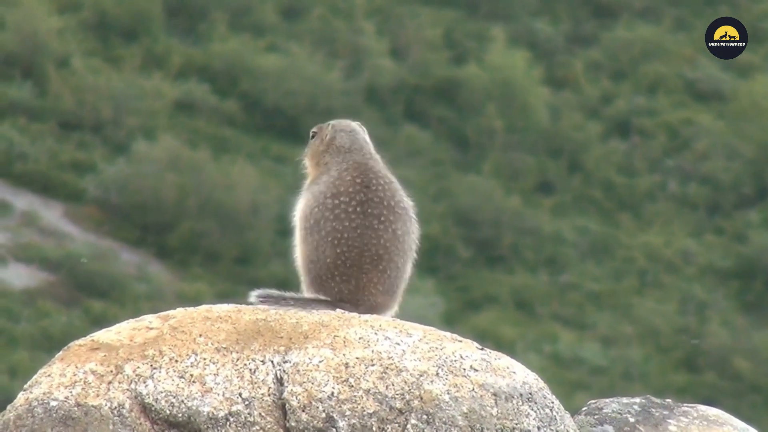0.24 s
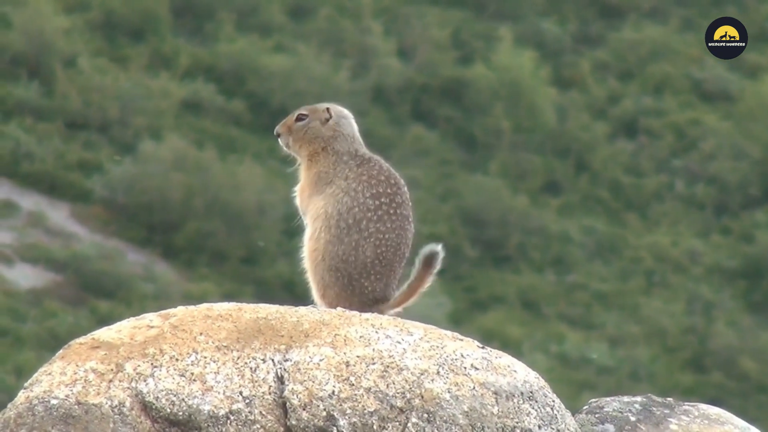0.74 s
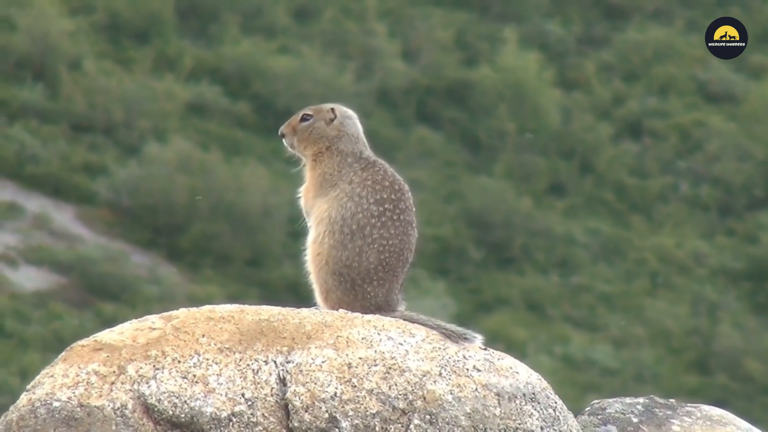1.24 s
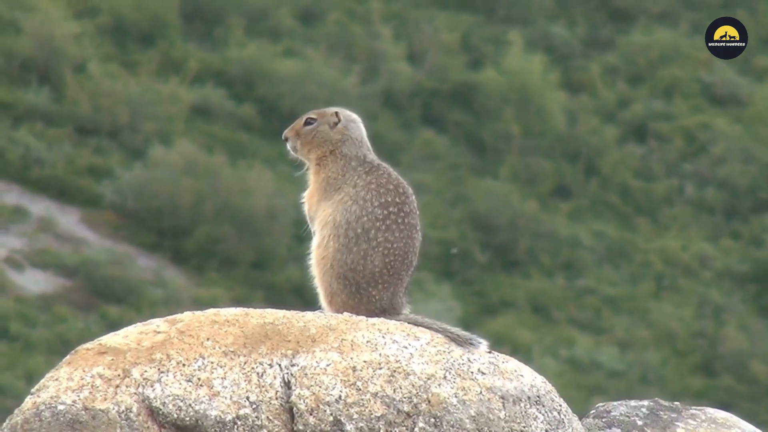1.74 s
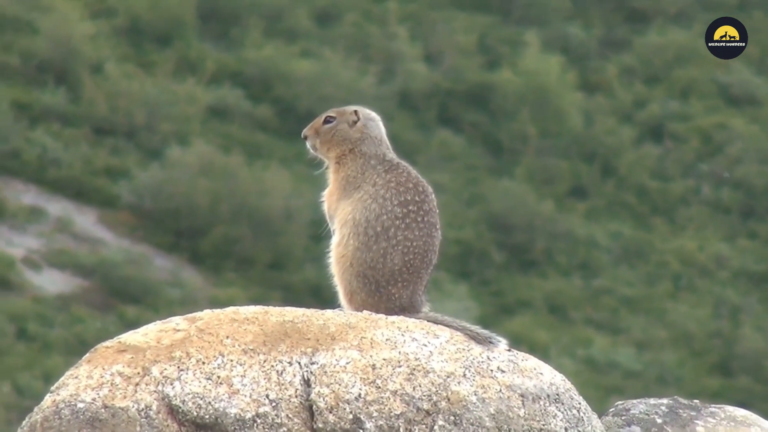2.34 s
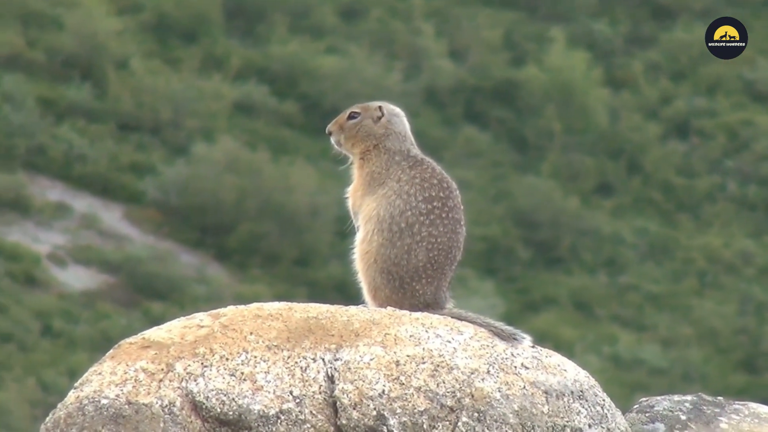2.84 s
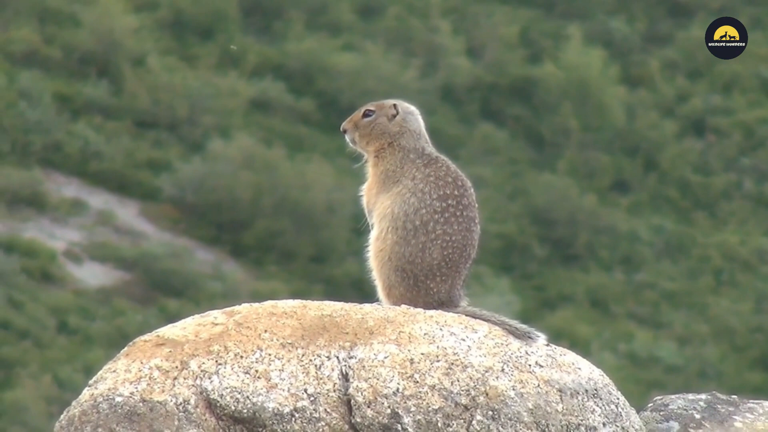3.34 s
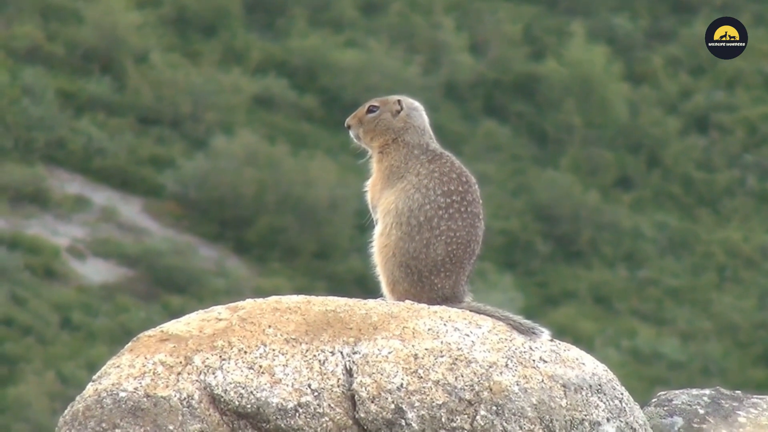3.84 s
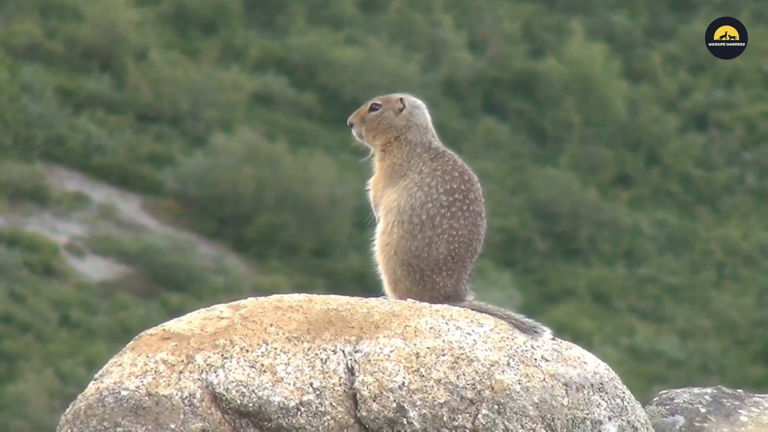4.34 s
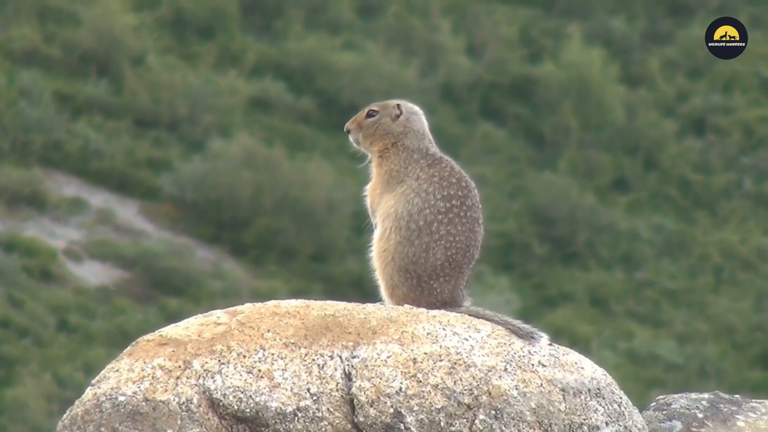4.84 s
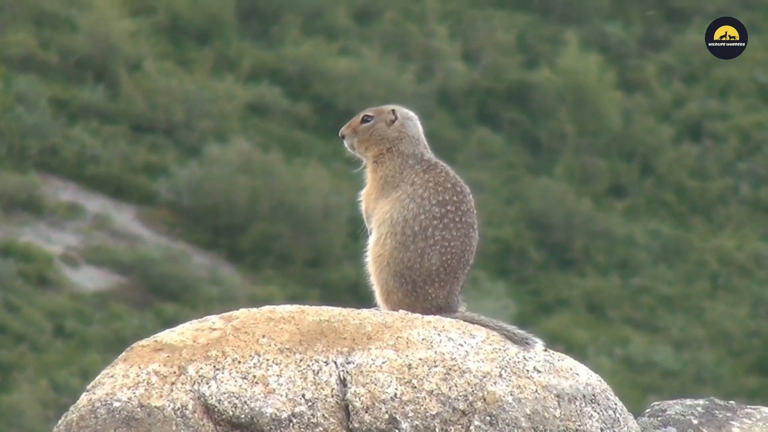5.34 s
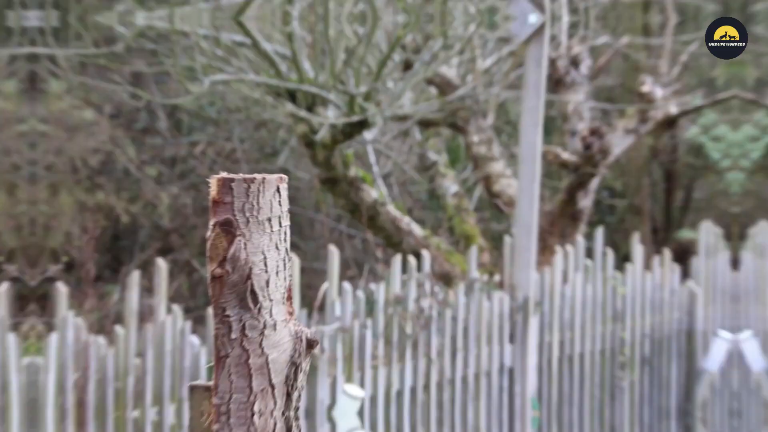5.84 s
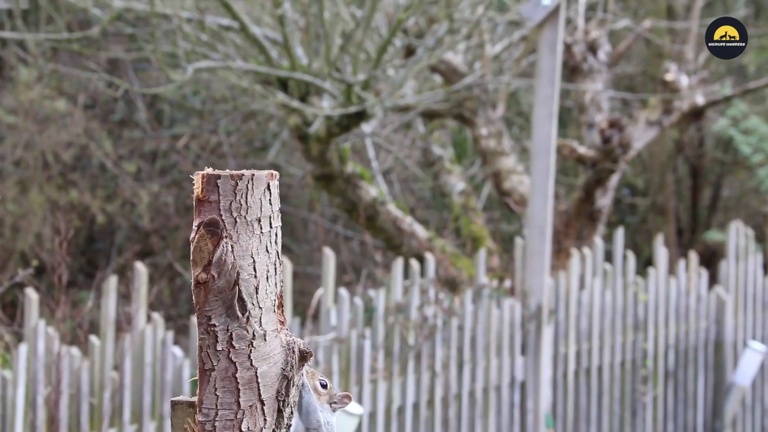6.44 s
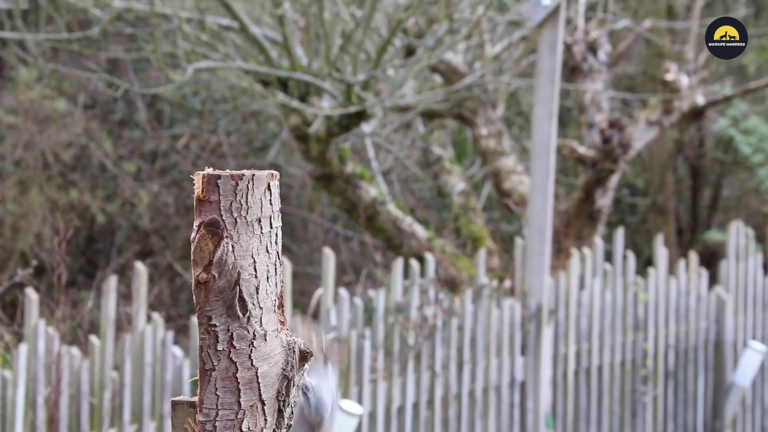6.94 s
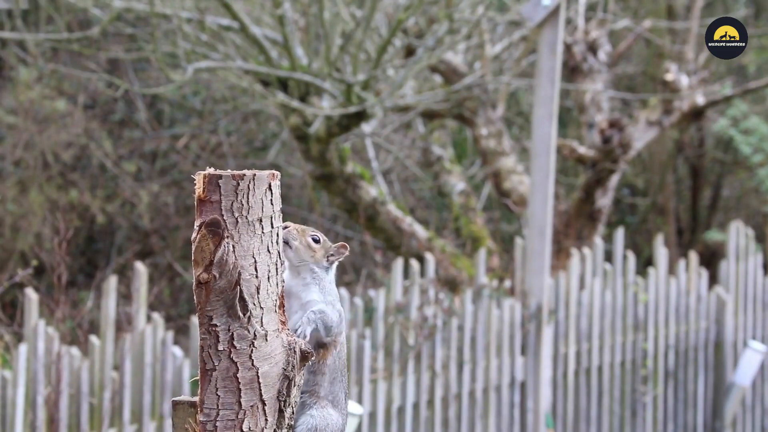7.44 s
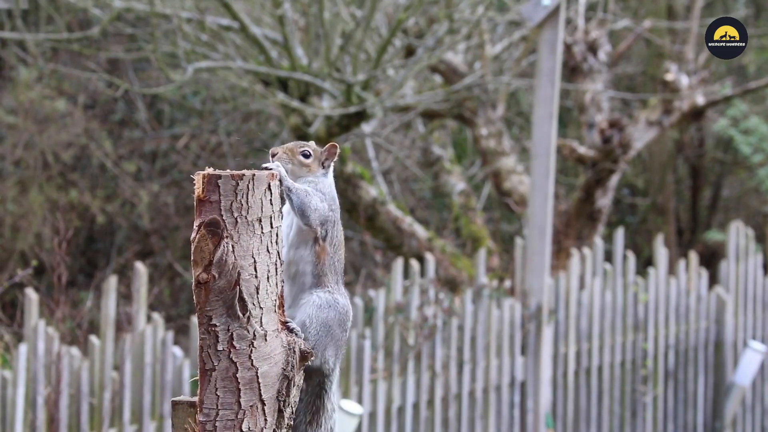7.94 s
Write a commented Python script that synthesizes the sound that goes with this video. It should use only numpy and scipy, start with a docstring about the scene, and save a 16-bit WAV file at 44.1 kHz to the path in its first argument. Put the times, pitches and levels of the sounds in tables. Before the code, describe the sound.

A ground squirrel gives seven piercing, falling whistle-squeals ending in rasp, echoing off an open slope among distant birds, before a louder outdoor rush enters.

```python
"""A ground squirrel squeals seven times on an open hillside; a gruff bark leads into one of the squeals.
Each squeal is a pure whistle from about 7 to 9 kHz that falls and ends in a rasp, made by a sine and shaped noise.
The slope echoes it through a scattered noise tail. Birds, built from gliding sines, whistle and warble further off.
Under it lies faint air made of coloured noise; late on, a louder, wider outdoor rush joins it."""
import sys
import numpy as np
from scipy import signal
from scipy.fft import rfft, irfft, next_fast_len
from scipy.io import wavfile
from scipy.ndimage import uniform_filter1d

SR = 44100
rng = np.random.default_rng(int(sys.argv[2]) if len(sys.argv) > 2 else 0)


def materialize(psi):
    """Save the field psi as 16-bit PCM at rate SR to the path in sys.argv[1].

    A 1-D psi becomes a single channel; in a 2-D psi each row is a channel.
    """
    bounded = np.clip(np.atleast_2d(psi).T, -1, 1)
    quanta = np.round(bounded * 32767).astype(np.int16)
    wavfile.write(sys.argv[1], SR, quanta)


N = 360738
T = np.arange(N) / SR


def undb(db):
    """Turn decibels into gain."""
    return 10 ** (np.asarray(db) / 20)


def unit(x):
    """Scale a sound to rms 1."""
    return x / np.sqrt(np.mean(x ** 2) + 1e-20)


def colour(x, points):
    """Filter a sound so that its spectrum follows (f/Hz, level/dB) points."""
    hz, db = np.transpose(points)
    f = np.maximum(np.fft.rfftfreq(len(x), 1 / SR), 1)
    gain = undb(np.interp(np.log(f), np.log(hz), db))
    return irfft(rfft(x) * gain, len(x))


def noise(points):
    """Coloured noise of rms 1."""
    white = rng.standard_normal(next_fast_len(N))
    return unit(colour(white, points)[:N])


def walk(rate, size=N):
    """Smooth random wandering, spread about 1, that changes about rate times a second."""
    k = max(int(SR / rate), 1)
    steps = np.repeat(rng.standard_normal(size // k + 2), k)
    return 1.3 * uniform_filter1d(uniform_filter1d(steps, k), k)[:size]


def curve(rows):
    """Join (t/s, value) rows by straight lines."""
    return np.interp(T, *np.transpose(rows))


def fade(sound):
    """Open and close a sound within a millisecond or two."""
    return sound * signal.windows.tukey(len(sound), min(1, 128 / len(sound)))


def add(track, start_s, sound):
    """Mix a sound into a track."""
    i = max(int(start_s * SR), 0)
    track[i:i + len(sound)] += fade(sound)[:max(N - i, 0)]


def slope(x, t60_s, build_s, early_db):
    """Echo scattered by rocks and brush: a quick near part and a long tail that builds up."""
    # tint of the echo: f/Hz, level/dB
    slope_tint = [(1000, -0.5), (2200, -2), (3100, -3.5), (4100, -4.5), (4700, 0), (6000, 9), (7300, 0.5),
                  (8900, -2.5), (9500, -43)]
    t = np.arange(int(1.3 * SR)) / SR
    tail = undb(-60 * t / t60_s)
    near = undb(early_db) * np.exp(-t / 0.013)
    shape = (1 - np.exp(-t / build_s)) * (tail + near)
    response = rng.standard_normal(len(t)) * shape / np.sqrt(np.sum(shape ** 2))
    return signal.fftconvolve(x, colour(response, slope_tint))[:N]


def restless(points, flicker_db):
    """Coloured noise whose lows and mids flicker on their own while the treble stays smooth."""
    x = noise(points)
    low, low_mid = (signal.sosfiltfilt(signal.butter(2, hz, fs=SR, output="sos"), x) for hz in (180, 900))
    low_part = low * undb(flicker_db * walk(12))
    mid_part = (low_mid - low) * undb(flicker_db / 2 * walk(12))
    return low_part + mid_part + x - low_mid


def hum(lines):
    """Faint tones that waver in level and phase."""
    tones = []
    for hz, db in lines:
        gain = np.sqrt(2) * undb(db + 2 * walk(2.4))
        tones.append(gain * np.sin(2 * np.pi * hz * T + 0.3 * walk(7.7)))
    return sum(tones)


def outdoors():
    """Quiet centred air, then a louder noise rush that starts with a low drone and is wide in the treble."""
    # spectra of the quiet air, the rush and its drone: f/Hz, relative level/dB
    air_tint = [(15, -61.5), (25, -17.5), (102, -7.5), (195, -18), (237, -10.5), (282, -18), (361, -15),
                (419, -16), (592, -18.5), (670, -20.5), (758, -20.5), (1070, -23.5), (2420, -28.5),
                (9210, -44.5), (12000, -79), (20300, -120)]
    rush_tint = [(25, 1), (50, 2), (120, -2.5), (220, -2), (380, -3.5), (560, -4), (750, -7.5), (1600, -17),
                 (2400, -16.5), (4000, -19.5), (6000, -23), (9000, -25.5), (14500, -30.5), (16000, -52.5)]
    drone_tint = [(230, -23), (310, 2.5), (360, 3.5), (430, -6.5), (520, 7), (600, -2.5), (760, -41)]
    # faint hums in the air and in the rush: f/Hz, level/dB (the rush hum also follows the rush level)
    air_hum = [(102.3, -83.5), (242.2, -76.5)]
    rush_hum = [(118.4, -60.5), (349.9, -59.5)]
    # how the rush comes in: t/s, rush level change/dB, drone level within the rush/dB
    rush_course = [(5.81, -45, -12), (5.845, -0.5, 3), (6.1, -1, 1), (6.5, 0.5, -8.5), (6.9, -1.5, -5),
                   (7.4, 0, -10.5), (7.8, -0.5, -15), (8.18, -1, -10)]
    air_db, rush_db = -65, -48.5
    s, level_db, drone_db = np.transpose(rush_course)
    air = restless(air_tint, flicker_db=4.0) * undb(air_db) + hum(air_hum)
    drone = noise(drone_tint) * undb(np.interp(T, s, drone_db))
    mid = (restless(rush_tint, flicker_db=0.8) + drone) * undb(rush_db) + hum(rush_hum)
    # added left and subtracted right, mostly in the treble: this makes the width
    side_tint = [(40, -14.5), (200, -10.5), (500, -7.5), (1000, -3), (4000, -1.5), (12000, -13)]
    side = colour(noise(rush_tint), side_tint) * undb(rush_db)
    rush = mid + side * np.array([[1], [-1]])
    return air + rush * undb(np.interp(T, s, level_db))


def rumble(voice):
    """Low noise that swells and fades with the loudness of each squeal."""
    # spectrum of the rumble: f/Hz, relative level/dB
    rumble_tint = [(20, -3.5), (50, -1), (110, -7.5), (250, -20), (700, -21), (2000, -36.5), (4000, -63.5)]
    below_voice_db = -33
    loudness = np.sqrt(np.abs(uniform_filter1d(voice ** 2, size=2048)))
    return undb(below_voice_db) * loudness * noise(rumble_tint)


def bumps():
    """Low bumps on the microphone: soft knocks made of quickly dying low sines."""
    # the bumps: t/s, f/Hz, level before the decay/dB, decay/s
    knocks = [(1.71, 91, -37.5, 0.0086), (2.214, 66, -36.5, 0.0073), (4.379, 35.2, -51.5, 0.053),
              (4.534, 74, -27, 0.0071), (4.594, 26.6, -30.5, 0.055), (5.479, 59.6, -37.5, 0.017),
              (5.79, 39.2, -44.5, 0.084), (6.491, 111, -36, 0.021)]
    out, t = np.zeros(N), np.arange(SR // 2) / SR
    for s, hz, db, decay in knocks:
        envelope = np.exp(-t / decay) * (1 - np.exp(-t / 0.00138))
        add(out, s, undb(db) * np.sin(2 * np.pi * hz * t) * envelope)
    return out


def noise_bursts():
    """Short grainy noise bursts, mostly around the squeals, some where the voice jumps register."""
    # the bursts: t/s, half length/s, level/dB
    burst_rows = [(3.707, 0.011, -75), (4.599, 0.03, -28), (5.421, 0.059, -54), (6.034, 0.035, -44.5),
                  (6.647, 0.02, -41), (6.742, 0.033, -37), (6.81, 0.01, -35)]
    # their spectrum: f/Hz, relative level/dB
    burst_tint = [(100, -2.5), (1000, -4), (3000, -5), (6000, 3), (8500, 6), (9300, -35), (15000, -43.5)]
    swells = sum(undb(db) * np.exp(-((T - s) / half) ** 2) for s, half, db in burst_rows)
    grain = undb(2 * walk(500))
    return swells * noise(burst_tint) * grain


def whistle(hz, db, rough, overtone_db, scatter_hz, edge):
    """One bird note: a sine and its octave along a pitch curve; roughness makes pitch and level waver."""
    u = np.linspace(0, 1, len(hz))
    phase = 2 * np.pi * np.cumsum(hz + rough * scatter_hz * walk(700, len(u))) / SR
    swell = np.abs(np.sin(np.pi * u)) ** edge
    gain = undb(db + 4.6 * rough * walk(140, len(u))) * swell
    return np.sqrt(2) * gain * (np.sin(phase) + undb(overtone_db) * np.sin(2 * phase))


def notes(table, overtone_db, scatter_hz, edge):
    """Whistled notes whose pitch bends smoothly through three points."""
    out = np.zeros(N)
    for start, length, first, middle, last, db, rough in table:
        bend = np.polyfit([0, .5, 1], [first, middle, last], 2)
        hz = np.polyval(bend, np.linspace(0, 1, int(length * SR)))
        add(out, start, whistle(hz, db, rough, overtone_db, scatter_hz, edge))
    return out


def level_notes(table):
    """Turn rows with one pitch into note rows that stay on it."""
    return [(start, length, hz, hz, hz, db, rough) for start, length, hz, db, rough in table]


def chatter(count=1100, blur_db=-1.5, chirps_db=-4):
    """Many far birds: short gliding chirps, partly blurred by distance into a band of noise."""
    # loudness of the chatter: t/s, level/dB
    chatter_course = [(0, -59.5), (.8, -59), (1.35, -60), (1.75, -59.5), (2.2, -61.5), (2.5, -67),
                      (2.9, -76.5), (3.8, -73), (4.4, -65.5), (5.2, -64), (5.7, -65.5), (6.2, -86)]
    # spectrum of the blur: f/Hz, relative level/dB
    blur_tint = [(1500, -38.5), (1900, -8.5), (2100, 3.5), (2800, 3), (3300, -4.5), (4500, -2.5),
                 (7000, -29.5)]
    when, length, pitch, glide, size = rng.random((count, 5)).T
    hz = 2100 + 950 * pitch ** 2
    half_glide = 130 * (glide - .5)
    rows = np.column_stack([6.2 * when, .02 + 0.044 * length,
                            hz - half_glide, hz, hz + half_glide, -12 * size, .3 * length])
    chirps = unit(notes(rows, overtone_db=-42.5, scatter_hz=201.8, edge=0.87))
    blur = noise(blur_tint)
    return (undb(blur_db) * blur + undb(chirps_db) * chirps) * undb(curve(chatter_course))


def arches():
    """A far bird's whistles, which climb from the foot, round off at the crest and drop back."""
    # start/s, rise/s, fall/s, foot f/Hz, crest f/Hz, level at the foot before mixing/dB, roughness/0-1
    arch_rows = [(.11, 0.084, 0.036, 3840, 5560, -69.5, 0.38), (.51, 0.12, 0.042, 3140, 5030, -50, 0.22),
                 (.635, 0.063, 0.028, 4280, 5380, -64, 0.24), (0.857, .108, .135, 3020, 6230, -55, .12),
                 (1.269, 0.093, 0.063, 2800, 4710, -47.5, .3), (1.548, 0.092, 0.066, 2770, 6510, -53, 0.21),
                 (1.995, .13, 0.045, 2860, 6100, -56.5, 0.07), (3.36, 0.073, 0.068, 3065, 3600, -61.5, 0.1),
                 (3.855, .115, .11, 3397, 4220, -62, .06), (4.09, .035, 0.07, 3050, 3580, -62.5, .08),
                 (4.75, 0.18, 0.079, 3550, 4140, -58, 0.1)]
    # every arch is rounder going up than coming down, and thinner as it climbs
    rise_bend, fall_bend, db_per_khz = 2.1, 1.1, -2.5
    out = np.zeros(N)
    for start, rise, fall, foot_hz, crest_hz, db, rough in arch_rows:
        t = np.arange(-rise, fall, 1 / SR)
        below = np.where(t < 0, np.abs(t / rise) ** rise_bend, np.abs(t / fall) ** fall_bend)
        hz = crest_hz - (crest_hz - foot_hz) * below
        climb_khz = (hz - foot_hz) / 1000
        note = whistle(hz, db + db_per_khz * climb_khz, rough, overtone_db=-29.5, scatter_hz=300, edge=0.35)
        add(out, start, note)
    return out


def far_birds(tick_s=0.0073, direct_db=-1, scattered_db=-5):
    """Arched and level whistles that flutter as they arrive by several paths, and a short run of dry ticks."""
    # level whistles: start/s, length/s, f/Hz, level before mixing/dB, roughness/0-1
    piping_rows = [(.13, 0.14, 3580, -59.5, 0.42), (.85, 0.15, 2950, -61.5, 0.1),
                   (1.25, .15, 2095, -60, 0.27), (1.6, 0.26, 2897, -55, 0.3), (2.1, .19, 2174, -58.5, 0.53),
                   (2.92, 0.091, 2740, -72, 0.6), (3.09, 0.072, 2465, -71, 0.7)]
    # dry ticks: t/s, level/dB
    tick_rows = [(.002, -56), (0.042, -54.5), (.07, -62), (0.114, -56.5), (.143, -59), (.197, -57.5),
                 (.228, -68)]
    # spectrum of the ticks: f/Hz, relative level/dB
    tick_tint = [(2500, -13), (3600, 6.5), (5000, -19), (6400, 0), (7500, -16), (9000, -43)]
    ticks = sum(undb(db) * np.exp(-((T - s) / tick_s) ** 2) for s, db in tick_rows)
    song = arches() + notes(level_notes(piping_rows), overtone_db=-34.5, scatter_hz=300, edge=.3)
    scattered = slope(song, t60_s=.12, build_s=.002, early_db=0)
    return undb(direct_db) * song + undb(scattered_db) * scattered + ticks * noise(tick_tint)


def tree_birds(direct_db=-3, echo_db=-1):
    """Birds in the trees all around: thin whistles whose echoes reach each ear by different paths."""
    # steady whistles: start/s, length/s, f/Hz, level before mixing/dB, roughness/0-1
    tree_rows = [(6.06, 0.22, 7070, -46, 0.12), (6.35, 0.24, 6870, -45, 0.24),
                 (6.6, 0.33, 2395, -61.5, 0.55), (7.15, 0.088, 3995, -49, 0.03),
                 (7.16, 0.19, 2410, -57.5, 0.24), (7.46, .12, 3230, -54.5, .6),
                 (7.58, 0.2, 2395, -59.5, 0.24), (7.71, 0.15, 3980, -50.5, 0.2),
                 (8.03, .18, 3310, -56.5, .55)]
    # quick falling chips: t/s, level before mixing/dB
    chip_rows = [(7.5, -58), (7.789, -55.5), (8.136, -58)]
    # pitch of every chip: first f/Hz, middle f/Hz, last f/Hz
    chip_pitch = (6240, 5200, 4240)
    chip_s = 0.021
    chips = [(s, chip_s, *chip_pitch, db, .12) for s, db in chip_rows]
    song = notes(level_notes(tree_rows) + chips, overtone_db=-48, scatter_hz=248, edge=0.11)
    around = np.array([slope(song, t60_s=0.84, build_s=0.0071, early_db=-5) for _ in range(2)])
    return undb(direct_db) * song + undb(echo_db) * around


def warble(count=5, rough=0.29):
    """A nearer bird's phrases: a swoop that rebounds, a trill of upsweeps that sink and fade, a level note."""
    # start/s, swoop/s, trill starts after/s, beat/s, first trill top f/Hz, closing note/s, swoop level/dB
    phrases = [(3.819, .076, .078, .0205, 2835, 0.056, -40.5), (4.158, .094, .094, .0195, 2550, 0.014, -40)]
    # tint given by the beak: f/Hz, level/dB
    beak_tint = [(1700, -5.5), (2000, -5.5), (2250, 2), (2500, -2.5), (2900, -7), (5000, -1.5)]
    # the swoop swings about the resting pitch and settles
    rest_hz, swoop_hz, swoop_turns, swoop_damping = 2165, 646, 1.05, 2.25
    # trill_duty is the share of a beat that sounds; the dB here are against the swoop
    trill_foot_hz, trill_duty, hz_per_beat = 1920, .88, -57.5
    trill_db, db_per_beat, closing_db = 3.5, -1.3, 2.1
    out, rows = np.zeros(N), []
    for start, swoop, trill_after, beat, top_hz, closing, db in phrases:
        u = np.linspace(0, 1, int(swoop * SR))
        hz = rest_hz + swoop_hz * np.exp(-swoop_damping * u) * np.cos(2 * np.pi * swoop_turns * u)
        add(out, start, whistle(hz, db, rough, overtone_db=-30.5, scatter_hz=140, edge=.35))
        trill_start = start + trill_after
        for k in range(count):
            top = top_hz + k * hz_per_beat
            beat_db = db + trill_db + k * db_per_beat
            middle = (trill_foot_hz + top) / 2
            rows.append((trill_start + k * beat, trill_duty * beat, trill_foot_hz, middle, top, beat_db, rough))
        rows += level_notes([(trill_start + count * beat, closing, rest_hz, db + closing_db, rough)])
    return colour(out + notes(rows, overtone_db=-44, scatter_hz=300, edge=0.6), beak_tint)


def buzz(flutter_hz=194, swing_hz=170, throb=0.37):
    """The nearer bird's falling whistle, whose pitch and level flutter so fast that it sounds husky."""
    # t/s, f/Hz, level before the flutter/dB
    buzz_course = [(4.899, 3230, -53), (4.921, 3020, -40), (4.964, 2620, -39.5), (5.018, 2256, -41.5),
                   (5.081, 2070, -47), (5.15, 2010, -49.5), (5.19, 1950, -67)]
    s, pitch, db = np.transpose(buzz_course)
    t = np.arange(s[0], s[-1], 1 / SR)
    flutter_rate = flutter_hz * (1 + 0.022 * walk(103, len(t)))
    flutter = np.sin(2 * np.pi * np.cumsum(flutter_rate) / SR)
    hz = np.interp(t, s, pitch) + swing_hz * flutter + 40 * walk(600, len(t))
    gain = np.sqrt(2) * undb(np.interp(t, s, db)) * (1 + throb * flutter)
    out = np.zeros(N)
    add(out, s[0], gain * np.sin(2 * np.pi * np.cumsum(hz) / SR))
    return out


def near_peeps():
    """Thin peeps near by: short whistles with a very weak octave."""
    # start/s, length/s, first f/Hz, middle f/Hz, last f/Hz, level/dB, roughness/0-1
    peep_rows = [(4.507, 0.12, 2940, 2880, 2930, -41, 0.17), (4.512, 0.067, 3280, 3240, 3200, -38.5, 0),
                 (4.602, .042, 2684, 2620, 2670, -36.5, 0.11), (5.367, 0.008, 8800, 8930, 8750, -35.5, 0),
                 (5.375, 0.095, 8900, 8730, 9250, -45.5, .25), (6.572, 0.012, 8900, 8800, 9050, -43, 0.06),
                 (2.213, .03, 8890, 8920, 8800, -43, .15), (4.541, .018, 9000, 9020, 8900, -43, 0),
                 (6.708, 0.017, 8830, 9050, 9200, -44, .2)]
    return notes(peep_rows, overtone_db=-44, scatter_hz=247, edge=0.49)


def held_down(echo, voice, threshold_db, release_s):
    """Fast gain control lowers the echo while the voice is loud and lets it swell back after."""
    power = np.abs(uniform_filter1d(voice ** 2, size=128))
    keep = np.exp(-1 / (release_s * SR))
    slow_power = signal.lfilter([1 - keep], [1, -keep], power)
    power = np.maximum(power, slow_power)
    return echo / np.sqrt(1 + power / undb(threshold_db) ** 2)


def bark(jitter=0.032, gruff=0.96):
    """A gruff bark: uneven voice pulses and noise that throbs with them, sent through the throat."""
    # t/s, pulse rate f/Hz, level/dB
    bark_course = [(4.49, 484, -39), (4.493, 512.4, -34.5), (4.513, 575, -29), (4.53, 642, -29),
                   (4.538, 572, -36), (4.546, 516, -40.5)]
    # resonance of the throat: f/Hz, relative level/dB
    throat_tint = [(300, -8.5), (560, -2), (1200, -3), (2500, -2), (4500, -3), (6000, 6), (8000, -12),
                   (9000, -40.5)]
    s, pitch, db = np.transpose(bark_course)
    t = np.arange(s[0], s[-1], 1 / SR)
    hz = np.interp(t, s, pitch) * (1 + jitter * walk(1200, len(t)))
    phase = 2 * np.pi * np.cumsum(hz) / SR
    pulses = unit(sum(np.cos(k * phase) / k ** 0.52 for k in range(1, 16)))
    gated = rng.standard_normal(len(t)) * (1 + .5 * np.cos(phase))
    air = unit(colour(gated, [(800, -8.5), (4000, -4.5), (9000, 1), (12000, -30.5)]))
    # the mouth smears each pulse: only the phases of a short noisy ring are used
    ring = rng.standard_normal(64) * np.exp(-np.arange(64) / SR / 0.00061)
    smear = np.exp(1j * np.angle(rfft(ring, len(t))))
    smeared = irfft(rfft(pulses + gruff * air) * smear, len(t))
    out = np.zeros(N)
    add(out, s[0], unit(colour(smeared, throat_tint)) * undb(np.interp(t, s, db)))
    return out


def squeal_pitch(t, start, top_hz, scoop_hz, hold, fall, bend):
    """Scoop to the top, perhaps slip to another register, fall to the break, then sink ever more slowly."""
    # register slips of the voice: t/s, step f/Hz, glide/s
    slip_rows = [(1.7206, -1367, 0.019), (5.461, -2150, 0.024), (5.986, -380, 0.0044), (5.999, 800, .004),
                 (7.1457, -510, .0017)]
    scoop_s, break_hz, lowest_hz = 0.011, 4587, 2200
    slips = [row for row in slip_rows if start < row[0] < start + hold + fall]
    held = top_hz - scoop_hz * np.exp(-(t - start) / scoop_s)
    held = held + sum(step * (1 + np.tanh((t - s) / glide)) / 2 for s, step, glide in slips)
    drop = top_hz + sum(step for _, step, _ in slips) - break_hz
    hz = held - drop * (np.maximum(t - start - hold, 0) / fall) ** bend
    # below the break the pitch only creeps towards its lowest value
    span = break_hz - lowest_hz
    sinking = lowest_hz + span * np.exp(np.minimum(hz - break_hz, 0) / span)
    return np.where(hz > break_hz, hz, sinking)


def squeal_level(t, start, attack, length, release):
    """Level in dB: a quick attack, full effort apart from brief level changes, and a release after the fall."""
    # moments when the squeal's level briefly changes, mostly dips: t/s, half length/s, level change/dB
    dip_rows = [(2.263, 0.0078, -7.5), (5.444, .002, 0.5), (6.019, 0.0019, -15), (6.751, 0.0042, -16)]
    attack_bend, release_db = 1.1, 32  # curve of the attack (1 = even); drop over one release time
    rise = attack_bend * 20 * np.log10(np.clip((t - start) / attack, 1 / SR, 1))
    decay = release_db * np.maximum(t - start - length, 0) / release
    dips = sum(db * np.exp(-((t - s) / half) ** 2) for s, half, db in dip_rows)
    return rise - decay + dips


def squirrel(jitter=0.0035, shimmer=.05, break_up=0.028, rasp_hz=4200, husk_db=-30):
    """Falling whistles that turn to rasp as the pitch nears rasp_hz; gives the voice and its echo share."""
    # start/s, attack/s, top f/Hz, scoop from below f/Hz, hold/s, fall/s, bend of the fall (1 = straight),
    # release/s, pitch waver/share, level/dB, echo send against voice/dB, rasp against tone before slack/dB
    squeal_rows = [(1.664, 0.056, 9005, 1798, 0.1, 0.077, 1.43, 0.016, 0.0031, -23, -18, -16),
                   (2.234, 0.013, 8800, 98, 0.0069, .136, 1.82, 0.017, .004, -23.5, -19, -19),
                   (4.558, .005, 8870, 0, 0.0043, .025, .92, 0.032, 0.0065, -20.5, -2.5, -8),
                   (5.426, 0.0096, 9030, 54, .062, 0.05, 1.52, 0.071, 0.0035, -20, -13.5, -11.5),
                   (5.931, 0.022, 7975, 1900, 0.11, 0.091, .76, 0.016, 0.012, -20, -17, -20.5),
                   (6.725, 0.0091, 8790, -0.5, 0.0096, .0615, 0.72, 0.055, 0.0056, -20.5, -13, -17.5),
                   (7.098, 0.0062, 6986, 652, 0.067, 0.089, 2.92, 0.046, 0.0043, -20, -19.5, -19)]
    # spectrum of the rasp: f/Hz, relative level/dB
    rasp_tint = [(60, -0.5), (300, -7.5), (1200, -12.5), (2500, -4), (4500, -4), (8500, -12.5), (9400, -27),
                 (15000, -39)]
    longest_release_s = 0.027  # the voice stops this long after the fall at the latest
    voice, sent, hiss = np.zeros(N), np.zeros(N), noise(rasp_tint)
    for start, attack, top_hz, scoop_hz, hold, fall, bend, release, waver, db, echo_db, rasp_db in squeal_rows:
        t = np.arange(start, start + hold + fall + min(release, longest_release_s), 1 / SR)
        hz = squeal_pitch(t, start, top_hz, scoop_hz, hold, fall, bend)
        hz = hz * (1 + waver * walk(120, len(t)))
        # the folds lose their grip at low pitch, most of all around rasp_hz
        slack = .05 + .95 / (1 + (np.log(hz / rasp_hz) / .2) ** 2) ** 1.5
        hz = hz * (1 + (jitter + break_up * slack) * walk(1400, len(t)))
        level_db = db + squeal_level(t, start, attack, hold + fall, release)
        gain = undb(level_db) * (1 + shimmer * walk(250, len(t)))
        husk = undb(husk_db) * walk(2500, len(t))  # turbulence spreads a skirt around the tone
        tone = np.sqrt(2) * gain * (1 + husk) * np.sin(2 * np.pi * np.cumsum(hz) / SR)
        rasp = gain * undb(rasp_db) * slack * hiss[int(start * SR):][:len(t)]
        add(voice, start, tone + rasp)
        add(sent, start, undb(echo_db) * (tone + rasp))
    return voice, sent


def scene():
    """The squirrel in front, its echo behind, birds and air around."""
    voice, sent = squirrel()
    gruff = bark()
    raw_echo = slope(sent + undb(-16.0) * gruff, t60_s=0.76, build_s=0.013, early_db=9.0)
    echo = held_down(raw_echo, voice, threshold_db=-28.0, release_s=0.0013)
    peeps = near_peeps()
    warbler = warble() + buzz()
    far = far_birds()
    bird_send = undb(-5.0) * warbler + undb(-4.5) * far + undb(-8.0) * peeps
    bird_echo = slope(bird_send, t60_s=1.3, build_s=0.0037, early_db=-14)
    birds = peeps + warbler + far + bird_echo + chatter() + tree_birds()
    return voice + gruff + echo + birds + noise_bursts() + bumps() + rumble(voice) + outdoors()


def record(dry):
    """The recorder cuts the top: a steep low-pass filter."""
    top_hz = 15700
    return signal.sosfilt(signal.ellip(8, .2, 70, top_hz, fs=SR, output="sos"), dry)


dry = scene()
out = record(dry)
materialize(out)
```